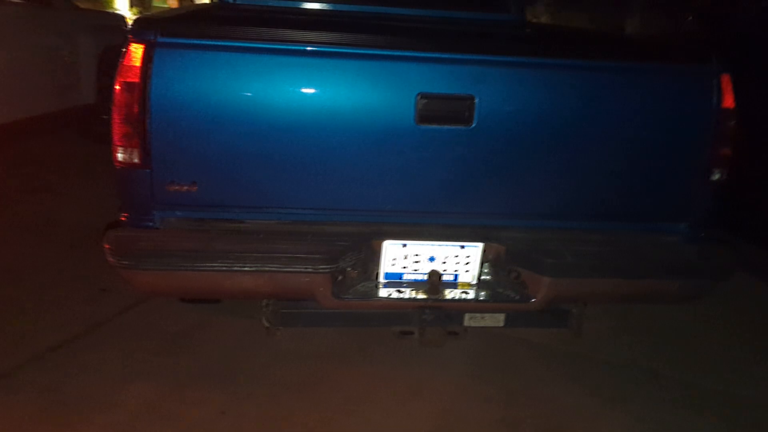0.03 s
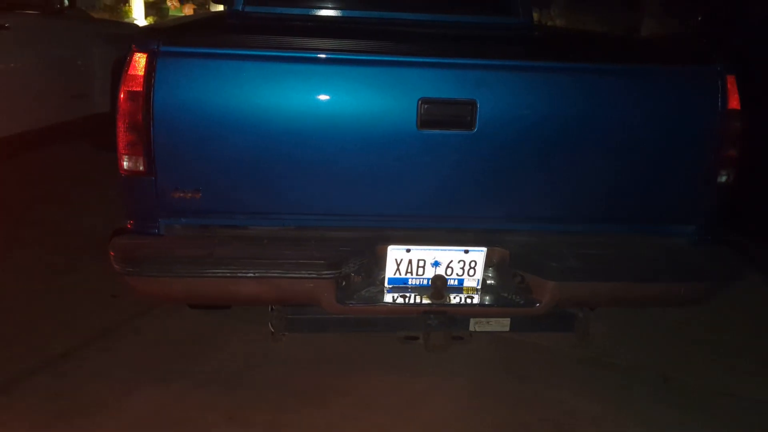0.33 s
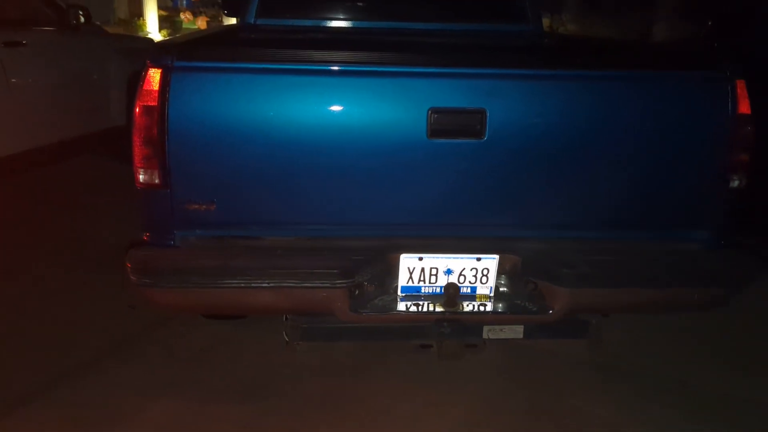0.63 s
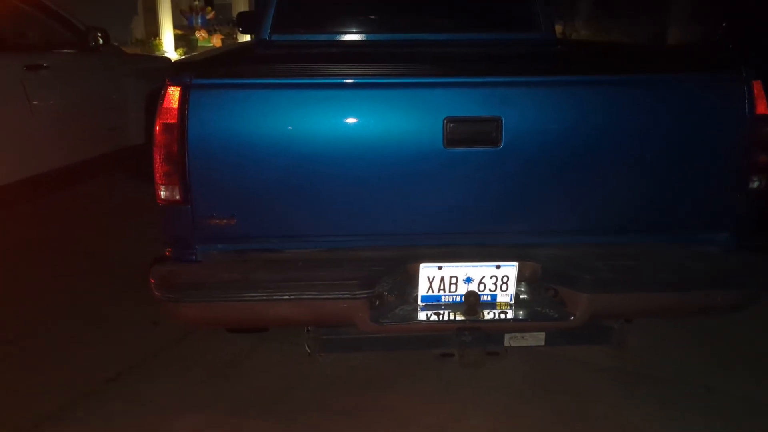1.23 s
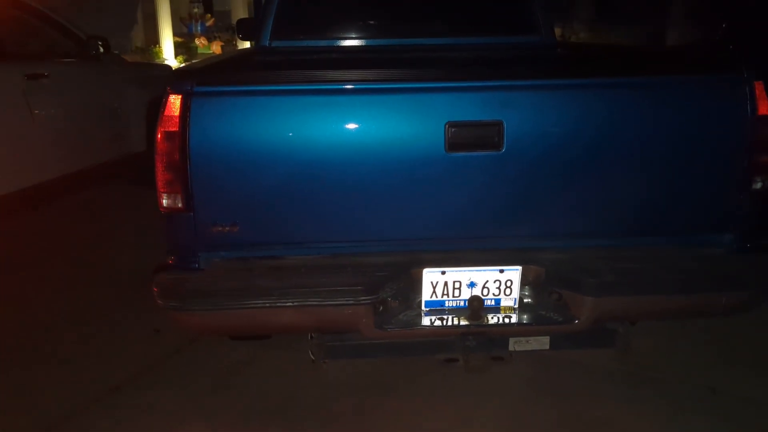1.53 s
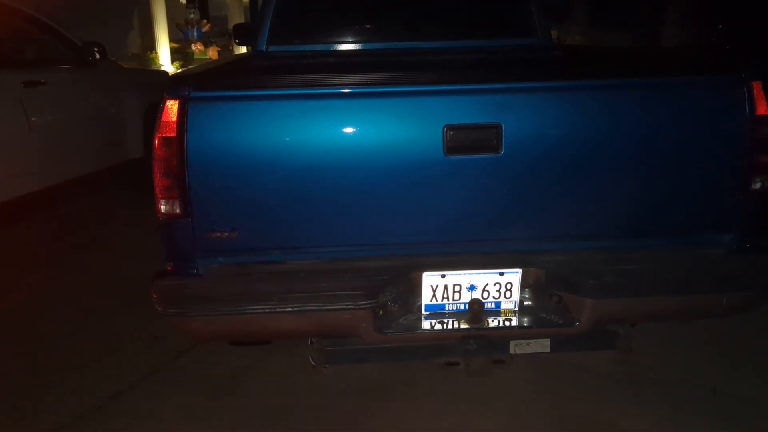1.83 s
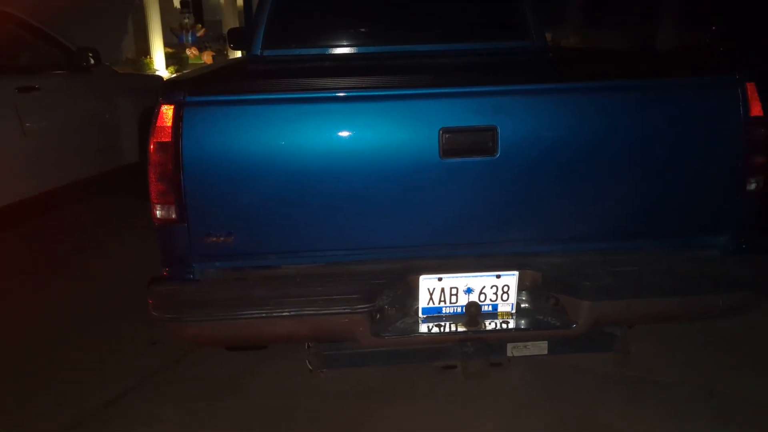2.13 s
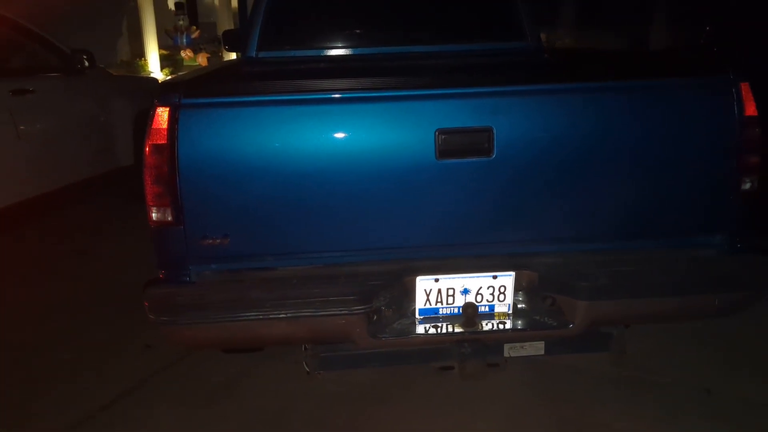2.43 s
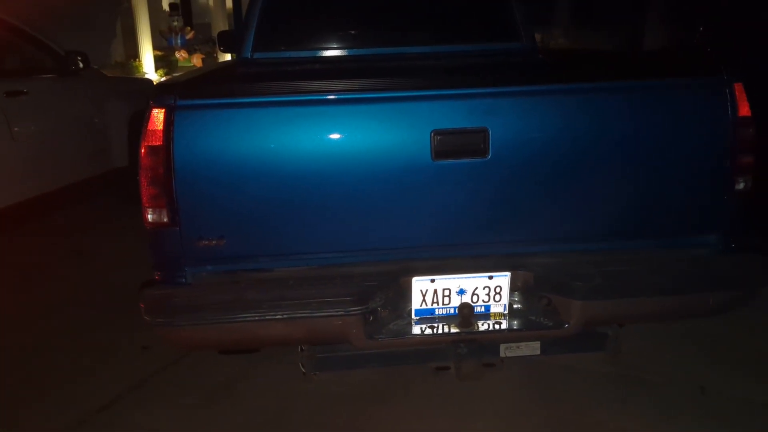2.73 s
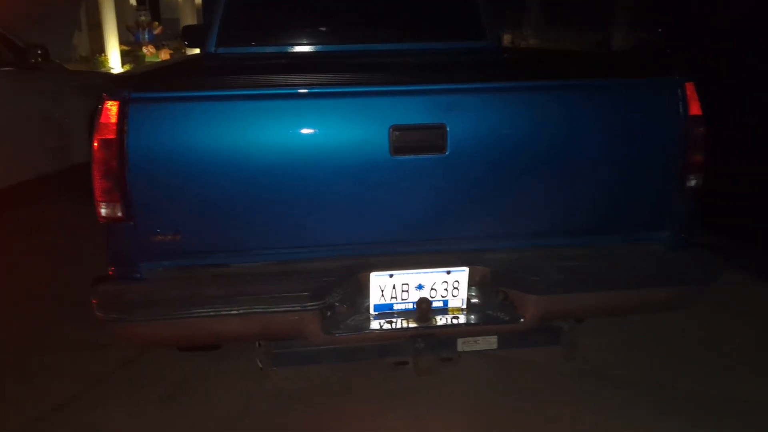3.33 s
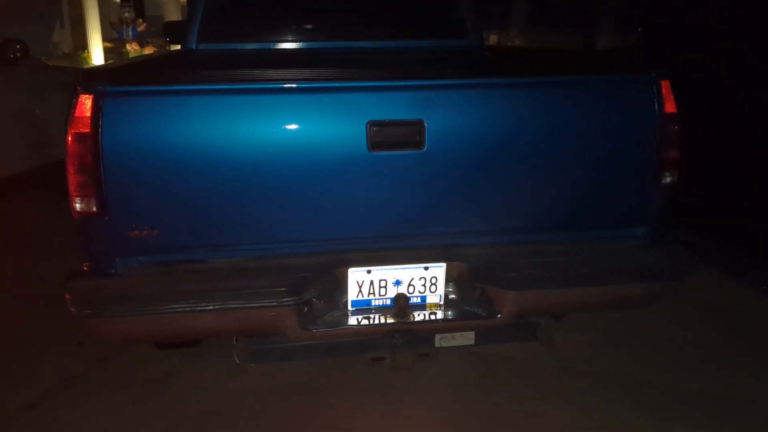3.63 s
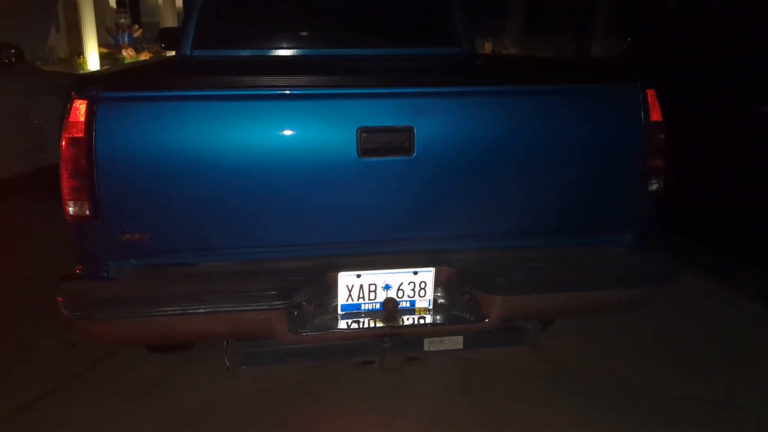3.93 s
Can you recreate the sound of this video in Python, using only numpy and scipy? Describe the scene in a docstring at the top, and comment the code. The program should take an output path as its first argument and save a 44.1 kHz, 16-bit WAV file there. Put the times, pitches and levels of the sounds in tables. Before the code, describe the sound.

A pickup truck engine cranks, catches and revs with a brief belt squeal.

```python
"""Distant machine hum and insects at night, on a stereo microphone behind a pickup's tailgate.
The starter clashes in and cranks the cold V8, which coughs, catches and flares with a rush of air,
a slipping belt and rattling metal, then sinks towards a burbling idle. Close to the microphone,
uneven exhaust pulses boom, bark and chuff; the engine bay arrives by scattered paths."""
import sys
import numpy as np
from scipy import signal
from scipy.fft import rfft, irfft
from scipy.io import wavfile
from scipy.ndimage import uniform_filter1d

SR = 44100
rng = np.random.default_rng(int(sys.argv[2]) if len(sys.argv) > 2 else 0)


def persist_wave(psi):
    """Save psi, clipped to +-1, as 16-bit WAV."""
    counts = np.round(np.clip(psi, -1, 1) * 32767).astype(np.int16)
    wavfile.write(sys.argv[1], SR, np.atleast_2d(counts).T)


N = 176400
T = np.arange(N) / SR

# The eight exhaust pulses of a cycle, near bank louder: strength
CYLINDERS = [1.36, 0.16, 0.22, 1.06, 0.13, 0.96, 1.23, 0.14]


def amp(db):
    """Decibels to gain."""
    return 10 ** (np.asarray(db) / 20)


def unit(x):
    """Scales to rms 1."""
    return x / np.sqrt(np.mean(x ** 2) + 1e-20)


def level(points):
    """Gain along a dB curve, silent before its first point."""
    return amp(np.interp(T, *np.transpose(points), left=-140))


def read(points, hz):
    """Reads a table on a log-frequency axis."""
    f, value = np.transpose(points)
    return np.interp(np.log(hz + 1), np.log(f + 1), value)


def steady(x, size=6000):
    """Evens out changes of power slower than `size` samples."""
    power = uniform_filter1d(uniform_filter1d(x ** 2, size), size)
    return x / np.sqrt(abs(power) + 1e-3 * np.mean(x ** 2))


def colour(x, spectrum, size=8192):
    """Causal filter with the given spectrum."""
    log_gain = np.log(amp(read(spectrum, abs(np.fft.fftfreq(size, 1 / SR)))))
    ring = np.fft.ifft(np.exp(np.conj(signal.hilbert(log_gain)))).real
    return signal.fftconvolve(x, ring[:size // 2])[:N]


def drift(hz):
    """Smooth random wander up to the given rate."""
    rolloff = 1 + (np.fft.rfftfreq(N, 1 / SR) / hz) ** 4
    return unit(irfft(rfft(rng.standard_normal(N)) / rolloff, N))


def whistle(hz, width):
    """A band of noise, `width` Hz wide, that follows a pitch."""
    phase = 2 * np.pi * np.cumsum(hz * np.ones(N)) / SR
    return unit(drift(width / 2) * np.cos(phase) + drift(width / 2) * np.sin(phase))


def scatter(x, t60, size=12000):
    """Dense reflections from the underbody and the driveway."""
    tail = rng.standard_normal(size) * amp(-60 * np.arange(size) / SR / t60)
    return signal.fftconvolve(x, tail / np.linalg.norm(tail))[:N]


def fade(x, seconds):
    """Gives each pulse an exponential tail."""
    return signal.lfilter([1], [1, -np.exp(-1 / (seconds * SR))], x)


def grit(spread_db):
    """Noise made of tiny impacts of uneven size."""
    return unit(rng.standard_normal(N) * amp(spread_db * drift(2250)))


def firings(cycles, uneven_db, contrast=1):
    """One pulse for each opening exhaust valve; low contrast makes the cylinders more alike."""
    slot = np.floor(cycles * len(CYLINDERS)).astype(int)
    at = np.flatnonzero(np.diff(slot))
    strength = np.take(CYLINDERS, slot[at] % len(CYLINDERS)) ** contrast
    chance = np.clip(rng.standard_normal(N)[:len(at)], -2, 2)
    pulses = np.zeros(N)
    pulses[at] = strength * amp((uneven_db * np.ones(N))[at] * chance)
    return pulses


def night():
    """Distant machine hum, insects, soft swells and still air."""
    machinery = [(44, -58.5), (51, -73.5), (59.2, -45.5), (87, -59), (102.3, -48.5), (150.7, -56.5),
                 (204.6, -61), (301.5, -64.5), (337.7, -70), (355.3, -63.5), (457.6, -64.5), (1685, -66)]  # far-off tones: pitch_hz, level_db
    nearby = [(0.143, 0.04, 2140, 1900, -48.5), (0.646, 0.041, 1960, 1300, -51.5),
              (0.972, 0.11, 202.1, 5, -51.5)]  # soft swells: peak_s, half_length_s, pitch_hz, width_hz, level_db
    choruses = [(3970, 120, -65), (3720, 300, -66)]  # insect bands: pitch_hz, width_hz, level_db
    still_air = [(12, -62), (20, -30), (37, -6.5), (59, -0.5), (105, -0.5), (135, -19.5), (270, -18.5),
                 (400, -24), (600, -21.5), (1200, -27), (1800, -20.5), (3090, -30.5), (3860, -24.5),
                 (4560, -32.5), (6200, -41), (8400, -33.5), (10500, -42), (15000, -50)]  # background spectrum: freq_hz, gain_db
    hum = sum(amp(db) * np.cos(2 * np.pi * hz * T + 2 * np.pi * rng.random() + .5 * drift(1.2))
              for hz, db in machinery)
    swells = sum(amp(db) * np.exp(-.5 * ((T - s) / half) ** 2) * whistle(hz, width)
                 for s, half, hz, width, db in nearby)
    insects = sum(amp(db) * whistle(hz, width) for hz, width, db in choruses) * amp(2 * drift(16))
    wash = amp(-45.5) * unit(colour(rng.standard_normal(N), still_air))
    return hum + swells + insects + wash


def starter(cycles):
    """The pinion clashes in, then its teeth grind against each compression."""
    whirr_spectrum = [(120, -30.5), (200, -9), (292, -14), (383, -19), (570, -10), (696, 1.5), (929, -12),
                      (1330, -20.5), (1880, -12), (2850, -21.5), (4550, -20.5), (5970, -30), (6530, -25),
                      (9210, -27), (15000, -52)]  # motor under load: freq_hz, gain_db
    whirr_level = [(1.6, -97), (1.63, -28.5), (1.7, -37.5), (1.8, -35.5), (1.87, -41.5), (1.97, -36),
                   (2.07, -42.5), (2.17, -36.5), (2.24, -35.5), (2.29, -39), (2.45, -38), (2.62, -34.5),
                   (2.7, -75)]  # starter load: time_s, level_db
    housing_modes = [(4550, 260, -16.5), (6470, 84, -17.5)]  # ringing housing: pitch_hz, width_hz, relative_db
    teeth_per_cycle = 270
    teeth = np.exp(-(cycles * teeth_per_cycle % 1) / 0.3)
    load = 1 + 0.12 * np.cos(2 * np.pi * len(CYLINDERS) * cycles)
    whirr = colour(grit(spread_db=5) * (0.37 + teeth) * load, whirr_spectrum)
    housing = sum(amp(db) * whistle(hz, width) for hz, width, db in housing_modes)
    whirr = (steady(whirr + 1.24 * scatter(whirr, t60=0.16)) + housing) * level(whirr_level)

    strikes = [(1.583, -27, 0.011, 0.047), (1.607, -16, 0.014, 0.0094)]  # pinion hits the flywheel: start_s, level_db, rise_s, decay_s
    clash_spectrum = [(120, -43), (200, -32), (385, -19), (701, 0), (921, -14), (1080, 1), (1280, -31),
                      (1650, -10.5), (3800, -7), (4160, -8.5), (4820, -9.5), (8010, 3), (15400, -11)]  # struck teeth: freq_hz, gain_db
    blows = sum(amp(db) * np.clip((T - s) / rise, 0, 1) * np.exp(-np.maximum(T - s - rise, 0) / decay)
                for s, db, rise, decay in strikes)
    clash = unit(colour(grit(spread_db=3), clash_spectrum)) * blows

    gear_spectrum = [(500, -44), (1500, -20), (2400, 0.5), (3900, 5.5), (5500, 4), (7500, -6), (10000, -22),
                     (15000, -28)]  # dry hiss of the gears: freq_hz, gain_db
    gear_level = [(1.62, -60), (1.7, -53), (1.95, -51.5), (2.07, -59), (2.17, -38), (2.23, -60),
                  (2.28, -34.5), (2.315, -44.5), (2.35, -27.5), (2.45, -37), (2.48, -45), (2.51, -25),
                  (2.58, -33), (2.68, -28), (2.8, -50)]  # loudest as the engine overruns them: time_s, level_db
    gears = colour(grit(spread_db=5) * (0.52 + teeth), gear_spectrum)
    gears = steady(scatter(gears, t60=0.053)) * level(gear_level)
    return whirr + gears + clash + 0.11 * scatter(clash, t60=0.1)


def cranking(cycles, knock_s=1.612):
    """The pinion seats with a knock, then every compression gives a soft chug."""
    knock_modes = [(692, -32, .11), (1034, -36, .08), (1117, -36, 0.075)]  # starter housing: pitch_hz, level_db, t60_s
    chug_spectrum = [(10, -60), (38, -10), (50, 7.5), (66, -9), (98, -1), (130, -7), (200, -9), (290, -9.5),
                     (370, -24), (2000, -70)]  # low thud of compression: freq_hz, gain_db
    chug_level = [(1.6, -55), (1.66, -50), (1.8, -44), (1.93, -45.5), (2.1, -44), (2.23, -42.5),
                  (2.33, -45), (2.5, -60)]  # chugs until the engine catches: time_s, level_db
    age = np.maximum(T - knock_s, 0)
    knock = sum(amp(db - 60 * age / t60) * np.sin(2 * np.pi * hz * age) for hz, db, t60 in knock_modes)
    gasps = fade(firings(cycles, uneven_db=1, contrast=.1), seconds=.03) * rng.standard_normal(N)
    return knock + steady(colour(gasps, chug_spectrum), size=3000) * level(chug_level)


def exhaust(cycles):
    """Stumbling pulses boom in the pipe; the hard ones bark with a puff of gas under the truck."""
    unevenness = [(2.3, 2.5), (2.6, 5), (2.9, 3.5), (3.15, 1.2), (3.55, 2.2), (3.7, 4), (4, 1.5)]  # pulse scatter of the cold cylinders: time_s, spread_db
    boom_spectrum = [(5, -82), (20, -46), (30, -9), (40, -22.5), (52, -0.5), (66, 2.5), (85, -3.5),
                     (105, -13.5), (135, -17.5), (180, -28.5), (400, -90), (1000, -127)]  # pipe resonances: freq_hz, gain_db
    boom_level = [(1.6, -62), (1.8, -35.5), (2.02, -48), (2.07, -50), (2.3, -40), (2.38, -24), (2.45, -18),
                  (2.52, -20), (2.57, -34), (2.62, -10), (2.7, -11.5), (2.85, -9.5), (2.95, -12),
                  (3.07, -10), (3.16, -7), (3.6, -8), (4, -7)]  # boom of the pipe: time_s, level_db
    uneven_db = np.interp(T, *np.transpose(unevenness))
    stumble_cycles_per_db = .004
    stumble = stumble_cycles_per_db * uneven_db * drift(25) * (cycles > 0)
    cycles = np.maximum.accumulate(cycles + stumble)
    boom = steady(colour(firings(cycles, uneven_db), boom_spectrum), size=2500)

    bark_spectrum = [(10, -67), (70, -22), (130, -2.5), (190, 4), (215, -2), (245, 2), (278, -4.5),
                     (310, -16.5), (400, -22), (520, -18), (690, -16.5), (900, -31), (1350, -34),
                     (8000, -87)]  # tone of the hard bark: freq_hz, gain_db
    bark_level = [(1.6, -75), (1.8, -58), (2.33, -54), (2.44, -29.5), (2.56, -39), (2.64, -23), (2.75, -23),
                  (2.9, -25.5), (3.15, -22.5), (3.3, -21), (3.43, -16.5), (3.6, -17.5), (3.69, -20),
                  (3.84, -18.5), (3.92, -31.5), (4, -27)]  # force of the bark: time_s, relative_db
    blows = firings(cycles, uneven_db=4.0, contrast=0.47)
    puffs = unit(fade(blows, seconds=0.0082) * rng.standard_normal(N))
    bark = colour(0.78 * unit(blows) + puffs, bark_spectrum)
    bark = bark + scatter(bark, t60=.12)
    bark = np.array([steady(bark + .15 * scatter(bark, t60=0.23), size=3000) for side in range(2)])
    return boom * level(boom_level) + bark * level(bark_level) * amp(-0.5)


def air_rush(cycles):
    """Intake and fan hiss, throbbing with the cylinders."""
    hiss_spectrum = [(200, -34), (700, -3), (1000, -6.5), (1300, -12), (1700, 11), (2100, -0.5), (2400, 0),
                     (2750, -1), (3400, -2), (4800, -3), (6200, -4), (7200, -2.5), (8200, 2), (9300, -0.5),
                     (10500, -6.5), (15000, -17.5)]  # intake and fan: freq_hz, gain_db
    hiss_level = [(2.1, -75), (2.31, -48), (2.34, -39.5), (2.45, -27.5), (2.485, -37), (2.51, -37),
                  (2.58, -32.5), (2.68, -26.5), (2.72, -27), (2.88, -24.5), (3.06, -23.5), (3.11, -26.5),
                  (3.16, -33), (3.23, -30.5), (3.55, -35), (4, -37)]  # rush of air: time_s, relative_db
    throb = unit(fade(firings(cycles, uneven_db=1.5, contrast=0.41), seconds=0.0071))
    hiss = colour(grit(spread_db=2.5) * (1 + 0.13 * throb), hiss_spectrum)
    return steady(hiss + 0.68 * scatter(hiss, t60=0.1)) * level(hiss_level) * amp(3.5)


def chuffs(cycles):
    """Each hard firing blows a short puff of gas out of the tailpipe."""
    puff_spectrum = [(100, -43), (300, -7.5), (400, -11), (480, -3), (600, 1), (700, 6), (800, -8.5),
                     (1000, -11), (1150, -12.5), (1350, -16), (3000, -28), (8000, -72)]  # gas at the tailpipe: freq_hz, gain_db
    puff_level = [(2.3, -60), (2.38, -41.5), (2.44, -37), (2.5, -41), (2.58, -45), (2.65, -27.5),
                  (2.71, -32), (2.75, -27.5), (2.87, -33), (3.0, -25), (3.12, -28.5), (3.2, -30),
                  (3.44, -25.5), (3.6, -33), (3.75, -28.5), (3.9, -39), (4, -33)]  # force of the puffs: time_s, level_db
    puffs = fade(firings(cycles, uneven_db=3, contrast=0.68), seconds=0.011) * rng.standard_normal(N)
    puffs = colour(puffs, puff_spectrum)
    sides = [steady(puffs + 0.58 * scatter(puffs, t60=0.18), size=3000) for side in range(2)]
    return np.array(sides) * level(puff_level)


def belt(pulley_hz=1694):
    """The belt slips with a hoarse rising squeal and sets a pulley ringing."""
    slip = [(2.55, 1600, -55), (2.61, 1603, -32.5), (2.671, 1678, -25), (2.72, 1640, -38.5),
            (2.759, 1670, -17.5), (2.801, 1690, -24), (2.831, 1660, -15), (2.89, 1708, -21.5),
            (2.949, 1916, -21.5), (3.02, 2120, -22), (3.108, 2090, -20), (3.159, 2030, -40),
            (3.5, 2005, -40), (4, 1950, -50)]  # course of the squeal: time_s, pitch_hz, level_db
    tones = [(1, 189, 3.5), (.93, 199, -5.5), (1.08, 330, -4), (1.36, 400, -20), (1.6, 600, -12.5),
             (1.999, 399.2, -21)]  # bands of the squeal: pitch_ratio, width_hz, relative_db
    pulley_level = [(2.6, -60), (2.8, -26), (3.16, -39), (3.22, -26.5), (3.36, -34), (3.45, -38),
                    (4, -44.5)]  # pulley ringing on after the slip: time_s, level_db
    s, hz, db = np.transpose(slip)
    pitch_hz = np.interp(T, s, hz)
    squeal = sum(amp(tone_db) * whistle(pitch_hz * ratio, width) for ratio, width, tone_db in tones)
    squeal = steady(squeal * amp(2 * drift(82)), size=900) * level(np.c_[s, db])
    reflections = 0.37 * scatter(squeal, t60=.15)
    pulley = steady(whistle(pulley_hz, width=51), size=2000) * level(pulley_level)
    return squeal + reflections + pulley


def rattle(knocks_per_s=76):
    """Loose metal rattles at the top of the flare, each mode rung by its own random knocks."""
    metal_modes = [(2654, 0, .06), (2757, 1, 0.089), (3020, -1.8, 0.061), (3530, -2, 0.046),
                   (4000, -1.6, 0.049), (4330, -2, 0.078), (4880, -2, 0.052)]  # loose metal: pitch_hz, relative_db, t60_s
    rattle_level = [(2.6, -51), (2.8, -37.5), (2.88, -25.5), (3.0, -25), (3.09, -29), (3.16, -39),
                    (3.3, -70)]  # strength of the shaking: time_s, level_db
    age = T[:6000]
    metal = np.zeros(N)
    for hz, db, t60 in metal_modes:
        knocks = (rng.random(N) < knocks_per_s / SR) * rng.standard_normal(N)
        ring = amp(db - 60 * age / t60) * np.sin(2 * np.pi * hz * age)
        metal += signal.fftconvolve(knocks, ring)[:N]
    return unit(metal) * level(rattle_level)


def scene():
    """The exhaust is close and central; the engine bay and the night arrive by scattered paths."""
    engine_speed = [(1.62, 1.12), (1.8, 2.39), (2.31, 2.234), (2.42, 7.17), (2.56, 6.2), (2.66, 9.85),
                    (2.8, 10.26), (2.93, 11.4), (3.01, 12.7), (3.11, 15.5), (3.2, 13.7), (3.31, 12.27),
                    (3.42, 13.2), (3.57, 13.35), (3.7, 13.6), (3.8, 10.6), (3.92, 11.03), (4, 8)]  # crank, cough, flare, settle: time_s, four_stroke_cycles_per_s
    coherence = [(60, 0.94), (250, 1), (500, 0.8), (1000, 0.26), (2000, 0.2), (4000, 0.1), (12000, 0.12)]  # left against right: freq_hz, likeness
    cycles = np.cumsum(np.interp(T, *np.transpose(engine_speed), left=0)) / SR
    paths = np.array([air_rush(cycles) + belt() + rattle() + starter(cycles) + night()
                      for path in range(2)])
    likeness = np.clip(read(coherence, np.fft.rfftfreq(2 * N, 1 / SR)), 0, 1)
    mid_side_gain = np.sqrt(np.array([1 + likeness, 1 - likeness]) / 2)
    mid, side = irfft(rfft(paths, 2 * N) * mid_side_gain)[:, :N]
    return exhaust(cycles) + chuffs(cycles) + cranking(cycles) + np.array([mid + side, mid - side])


def record(dry):
    """Unequal microphone ports, a quick fade-in, soft overload and the band limit."""
    imbalance = [(60, 1), (110, -0.5), (200, -4), (380, 2), (700, -0.5), (1290, -4.0), (2380, -3.0),
                 (4390, -7), (8110, -14), (15000, 5.5)]  # microphone ports: freq_hz, left_minus_right_db
    open_s, ceiling, cutoff_hz = 0.0694, .95, 15600
    lean = amp(read(imbalance, np.fft.rfftfreq(2 * N, 1 / SR)))
    port_gain = np.array([lean, np.ones_like(lean)]) * 2 / (1 + lean)
    ports = irfft(rfft(dry, 2 * N) * port_gain)[:, :N]
    ports = ports * np.clip((T - open_s) / .004, .003, 1)
    clipped = ports / (1 + (abs(ports) / ceiling) ** 6) ** (1 / 6)
    lowpass = signal.firwin(511, cutoff_hz, window=("kaiser", 9), fs=SR)
    return signal.oaconvolve(clipped, lowpass[None], "same")


dry = scene()
out = record(dry)
persist_wave(out)
```